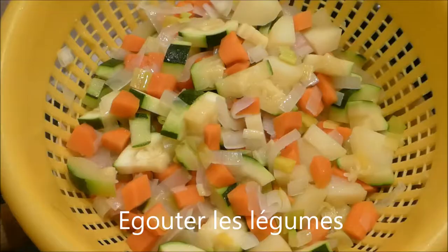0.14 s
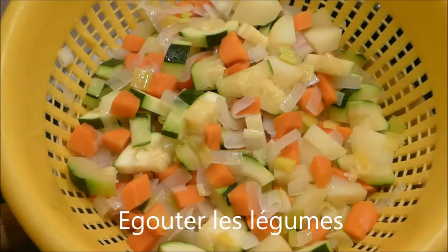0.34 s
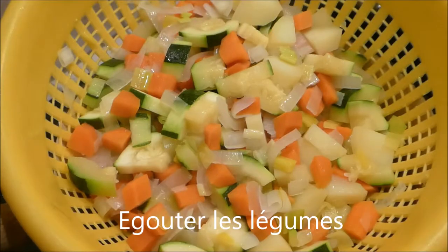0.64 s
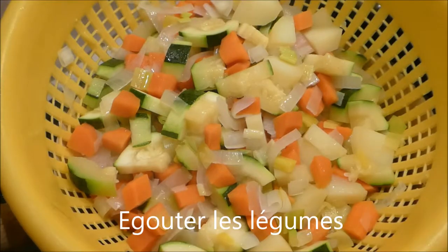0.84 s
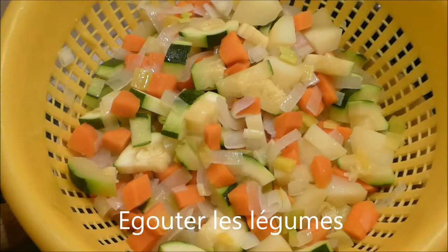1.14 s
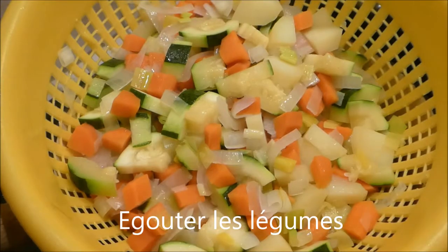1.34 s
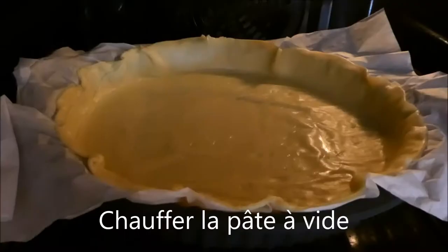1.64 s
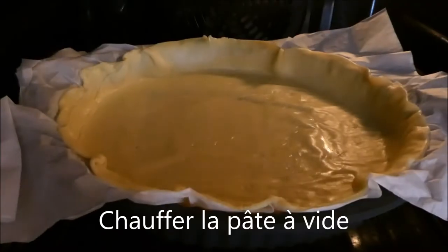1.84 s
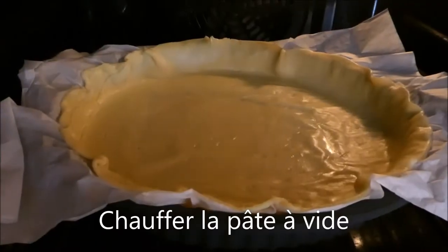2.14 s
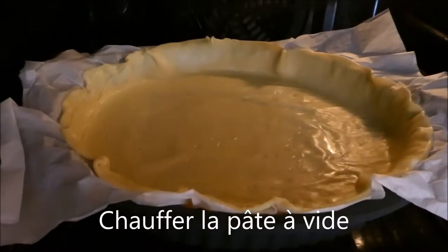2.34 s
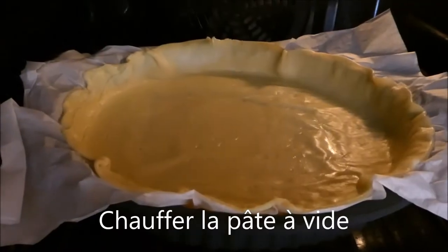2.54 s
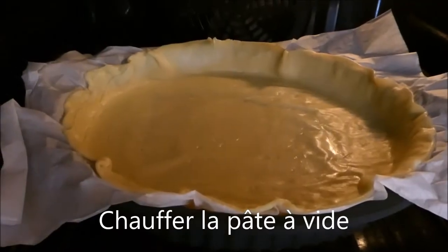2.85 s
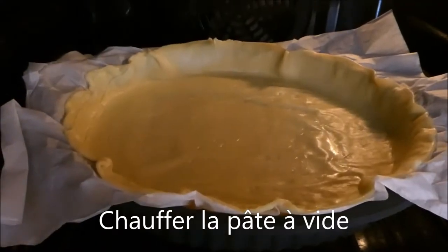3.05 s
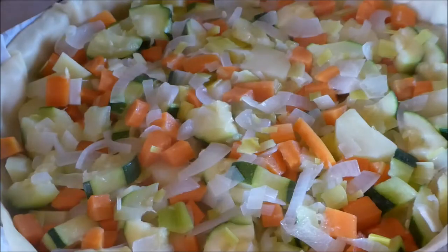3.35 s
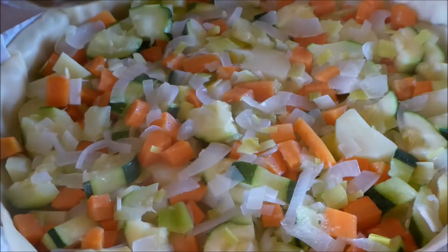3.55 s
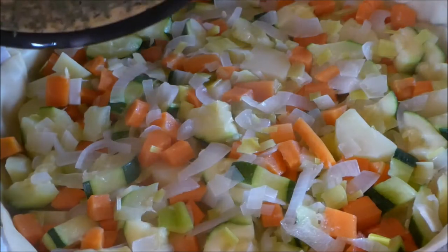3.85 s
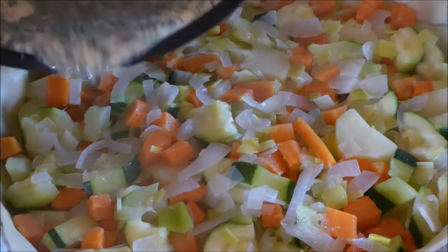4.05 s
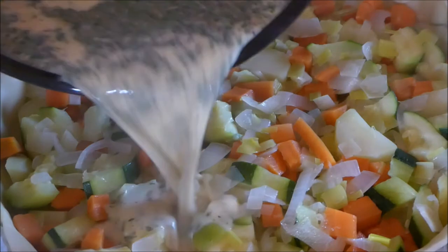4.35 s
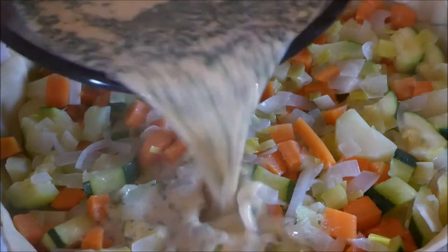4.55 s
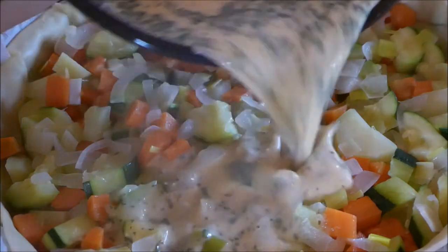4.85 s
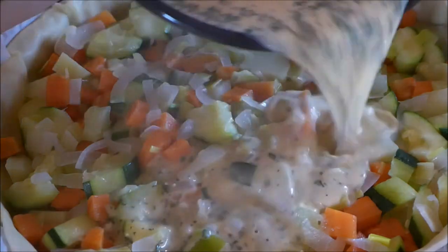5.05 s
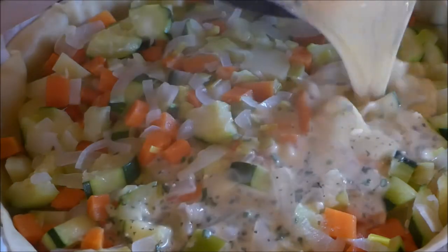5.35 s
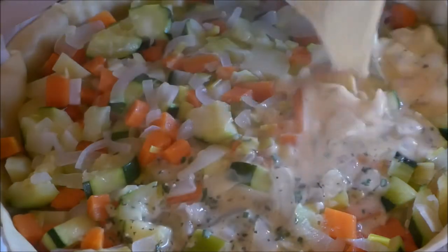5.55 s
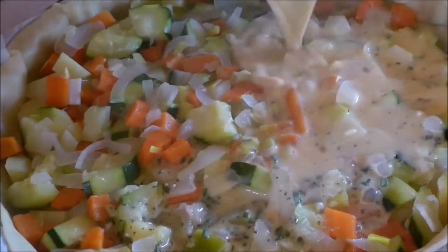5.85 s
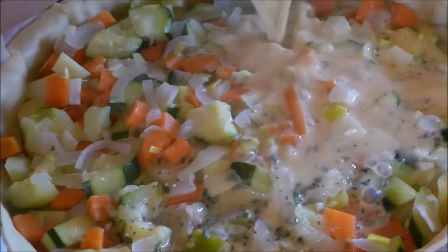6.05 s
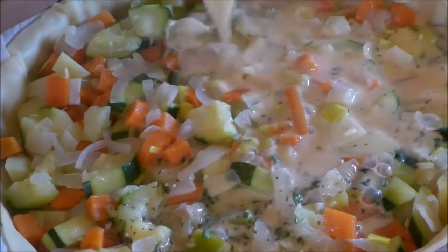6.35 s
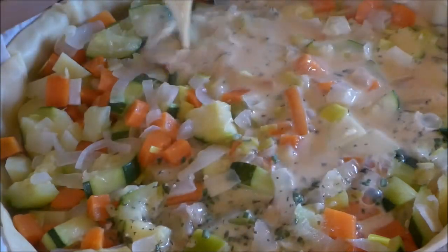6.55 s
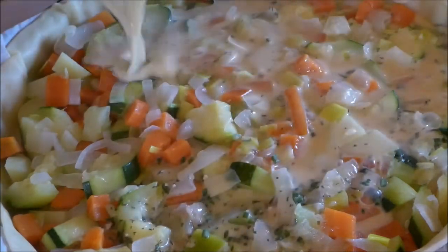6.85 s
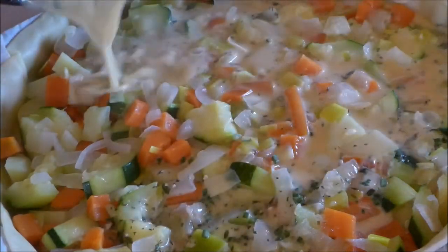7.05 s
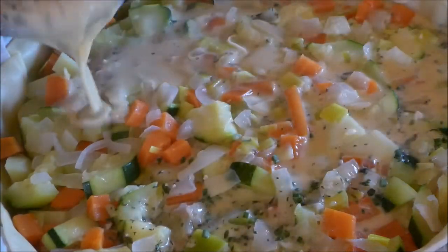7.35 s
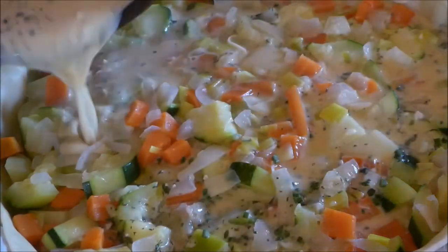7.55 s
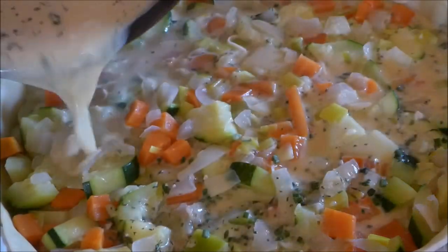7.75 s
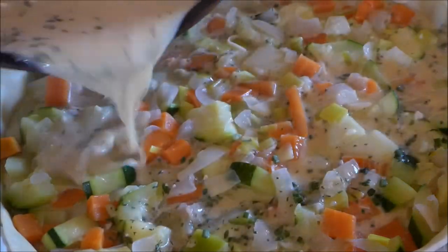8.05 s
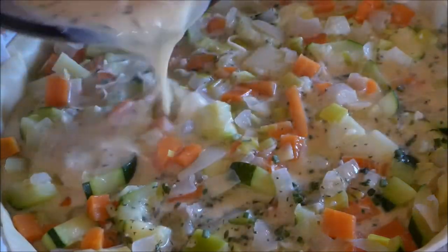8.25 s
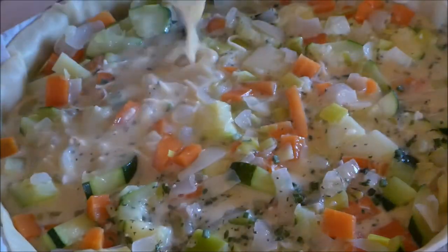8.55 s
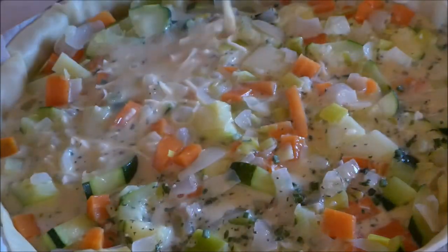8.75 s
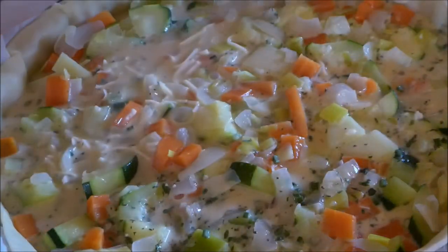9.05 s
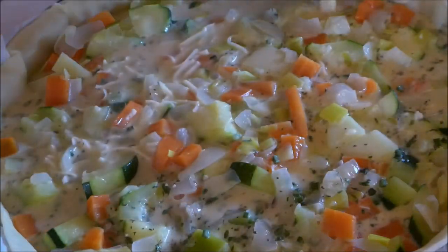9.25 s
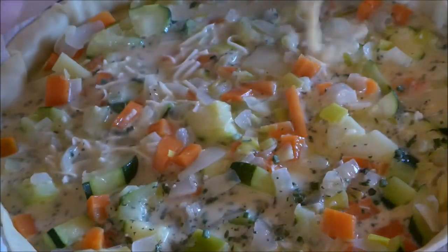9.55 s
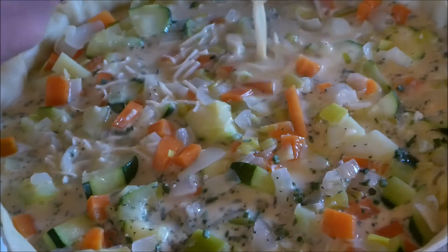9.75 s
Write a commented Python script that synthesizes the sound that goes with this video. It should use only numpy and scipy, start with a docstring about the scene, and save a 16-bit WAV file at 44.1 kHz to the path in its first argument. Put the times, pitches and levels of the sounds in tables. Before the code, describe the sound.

A whisk clatters on a glass bowl, a quiet room, a roaring fan oven, then faint wet ticks over distant fan noise and late bowl knocks.

```python
"""A kitchen, in four scenes joined by hard cuts with short silences between them. Whisk: wires strike and
scrape a glass bowl as struck modes and noise, over sloshing eggs. Quiet room: soft hiss, a distant hum, light
taps and thin chirps. Fan oven: rushing air, whistling duct, motor tones. Pour: egg mixture over diced
vegetables, nearly silent: small wet ticks of noise and ringing, knocks of the bowl, a brief slide of the whisk;
further off, steady fan noise, bright noise that fades and a thin whistle that sets in."""
import sys
import numpy as np
from scipy import signal
from scipy.fft import rfft, irfft, next_fast_len
from scipy.io import wavfile
from scipy.ndimage import map_coordinates

SR = 44100
rng = np.random.default_rng(int(sys.argv[2]) if len(sys.argv) > 2 else 0)


def waveform_to_disk(signal):
    """Save audio, clipped to [-1, 1], as 16-bit WAV at the path in sys.argv[1]."""
    frames = np.transpose(np.atleast_2d(signal))
    scaled = np.clip(frames, -1, 1) * 32767
    samples = np.round(scaled).astype(np.int16)
    wavfile.write(sys.argv[1], SR, samples)


N = 436587

# when each scene is heard: (start [s], end [s]); the last one runs to the end
WHISKING, WAITING = (0, .1685), (.202, 1.672)
BAKING, POURING = (1.831, 3.138), (3.171, 10)
# left-right likeness of the air behind the pour: (frequency [Hz], coherence [-1 to 1])
POUR_ALIKE = [(60, -0.25), (150, -0.3), (380, -0.12), (950, 0.19), (2380, 0.4), (5980, 0.65), (15000, 0.53)]


def pour():
    """Clear wet ticks over a random sprinkle of fainter ones that thins out with the stream."""
    # the clearest ticks among the vegetables:
    # (time [s], peak level [dB], starting pitch [Hz], snap [0 round pop to 1 dry crack])
    clear_ticks = [(3.9061, -32.5, 6000, .55), (3.915, -38, 11500, 0.4), (4.348, -44, 3100, 0.58),
                   (4.4697, -43, 2210, .4), (4.627, -49, 11000, .5), (4.6503, -29, 3300, .52),
                   (4.7955, -43, 12900, 0.35), (4.862, -46, 7200, .3), (4.8665, -46, 12500, .5),
                   (4.9671, -35, 10000, .65), (5.1008, -39.5, 6000, .3), (5.1156, -36, 7400, .2),
                   (5.1175, -39, 7700, .2), (5.1315, -38, 10500, .3), (5.1388, -38, 2500, 0.52),
                   (5.4485, -44, 11000, .2), (5.4512, -38.5, 3380, 0.76), (5.5046, -40.5, 6200, .55),
                   (5.5249, -44, 12200, 0.4), (5.5305, -45, 13000, .2), (5.5545, -43.5, 5300, .3),
                   (5.868, -44, 2700, 0.56), (5.9155, -46, 11500, .6), (5.943, -38, 5170, 0.1),
                   (6.006, -46, 2300, .2), (6.0865, -47, 2900, 0.55), (6.186, -45, 6500, 0.35),
                   (6.193, -42, 12800, .2), (6.1995, -40, 11000, 0.36), (6.257, -45, 9000, .7),
                   (6.311, -36, 4600, .65), (6.345, -47, 7500, .1), (6.363, -46, 11000, .5),
                   (6.372, -42, 12500, 0.5), (6.424, -34, 6620, .15), (6.4414, -36.5, 9600, .4),
                   (6.5533, -44, 8500, 0.2), (6.569, -45, 7300, .15), (6.683, -41, 5340, .2),
                   (6.6845, -44, 11500, 0.45), (6.7175, -44, 6200, 0.1), (6.7382, -38, 5800, .25),
                   (6.831, -44, 4600, .6), (6.868, -43, 9000, 0.3), (7.403, -40, 8830, .2),
                   (7.413, -39, 8500, .1), (7.6355, -41.5, 7300, .3), (7.7059, -41.5, 11500, 0.7),
                   (7.815, -39, 10700, 0.36), (8.2063, -41.5, 6250, .2), (8.547, -39, 6530, .4),
                   (8.765, -46, 11700, 0.25), (9.08, -45, 11200, .4), (9.18, -44.5, 9900, 0.3),
                   (9.28, -42, 5200, .8), (9.8737, -36.5, 6400, 0.26)]
    # close walls answer each tick: (delay [s], level [dB])
    walls = [(.0062, -15), (.0105, -18)]
    stream_start_s, stream_length_s, thinning = 4.3, 4.9, 1.2
    faintest_db, range_db = -56, 8  # peak levels of the sprinkle
    low_hz, high_hz = 3510, 13040
    ticks = np.zeros(N)
    for s, db, hz, snap in clear_ticks:
        add(ticks, s, amp(db) * wet_tick(hz, snap))
    for when, size, pitch, snap in rng.random(size=(120, 4)):
        s = stream_start_s + stream_length_s * when ** thinning
        hz = low_hz * (high_hz / low_hz) ** pitch
        db = faintest_db + range_db * size ** 2  # loud ones are rare
        add(ticks, s, amp(db) * wet_tick(hz, snap))
    echoes = sum(amp(db) * np.pad(ticks, (round(delay * SR), 0))[:N] for delay, db in walls)
    return in_room(ticks + echoes, wet_db=-8)


def wet_tick(hz, snap):
    """A wet film breaks: a broadband crack, and the short ring of the pocket behind it; peak 1."""
    life_s = 0.0082 * np.sqrt(7000 / hz)  # lower pockets ring longer
    attack_s, crack_t60_s = 0.00025, 0.0044
    pop = tick(hz, life_s, grit=0.58)
    t = clock(len(pop))
    noise = rng.standard_normal(len(t))
    crack = filtered(noise, lambda f: f / (f + 1500) / (1 + (f / 11000) ** 4))
    crack *= amp(-60 * t / crack_t60_s)
    share = np.clip(snap, 0, 1)
    ringing = pop * (1 - np.exp(-t / attack_s))
    x = (1 - share) * ringing + share * crack / np.abs(crack).max()
    return x / np.abs(x).max()


def tick(hz, life_s, grit):
    """A tiny pop: slightly rising ring and a puff of noise, down 60 dB after its life; peak 1."""
    t = clock(SR // 30)
    noise = rng.standard_normal(len(t))
    puff = unit(filtered(noise, lambda f: 1 / (1 + (2 * np.log((f + 1) / hz)) ** 4)))
    phase = 2 * np.pi * hz * t * (1 + 0.075 * np.minimum(t / life_s, 1))
    x = (np.sin(phase) + grit * puff) * amp(-60 * t / life_s)
    return x / np.abs(x).max()


def bowl_knocks():
    """The tilted bowl knocks a little to the right: dull thud, ringing rim and a crack of noise."""
    # each knock, before the bass is cut:
    # (time [s], thud peak [dB], ring peak [dB], crack rms at its start [dB])
    blows = [(4.5738, -34, -50, -58), (9.3385, -22.5, -21, -42), (9.5088, -18, -41, -55)]
    # the dull, quickly damped part: (frequency [Hz], relative level [dB], t60 [s])
    thud = [(270, -21, .04), (400, -13, .028), (530, -10, .02), (650, -2, .021), (770, 1, .013),
            (900, -2, .014), (1060, -11, .014)]
    # the ringing part; close neighbours beat: (frequency [Hz], relative level [dB], t60 [s])
    rim = [(1146, -13, .14), (1159, -3, .075), (1460, -4, .016), (1600, -2, .016), (1960, -14, .08),
           (2050, -5, .045), (2120, -11, .11), (2240, -8, .04), (2460, -12, .022), (3260, -28, .06),
           (4650, -28, .06)]
    knocks, t = np.zeros(N), clock(SR // 30)
    for s, thud_db, ring_db, crack_db in blows:
        add(knocks, s, amp(thud_db) * struck(thud, scatter_db=1.5))
        add(knocks, s, amp(ring_db) * struck(rim, scatter_db=1))
        noise = rng.standard_normal(len(t))
        crack = unit(filtered(noise, lambda hz: 1 / (1 + (hz / 9000) ** 6)))
        add(knocks, s, amp(crack_db) * crack * amp(-60 * t / 0.0099))
    return in_room(low_cut(knocks, edge_hz=284), wet_db=-7) * amp([[-.9], [.9]])


def struck(modes, scatter_db):
    """Modes set off in phase by one clean blow, each at a new strength; peak 1."""
    t = clock(SR // 3)
    x = np.zeros(len(t))
    for hz, db, t60 in modes:
        x += amp(db + scatter_db * rng.normal() - 60 * t / t60) * np.sin(2 * np.pi * hz * t)
    x *= 1 - np.exp(-t / 0.0013)  # soft attack
    return x / np.abs(x).max()


def whisk_slide():
    """The whisk slides in the tilted bowl: a hiss with a short zing, then a rub, all with uneven grip."""
    # hiss of wet wires on glass: (frequency [Hz], relative density [dB per Hz])
    wet_wires = [(1500, -8), (4200, -4.5), (4700, -1), (5300, -1.5), (8000, -1.5), (11500, -1.5),
                 (15500, -20)]
    hiss = swell(crest_s=9.5, db=-48, rise=111, fall=48) * rush(wet_wires, POUR_ALIKE, [(4700, 200, 3.5)])
    # both resonances sink as the wires slide on
    zing = swell(crest_s=9.5, db=-52, rise=130, fall=150)
    zing = zing * sinking(centre_hz=4690, half_width_hz=100, crest_s=9.5, hz_per_s=600)
    rub = swell(crest_s=9.79, db=-54, rise=45, fall=110)
    rub = rub * sinking(centre_hz=2980, half_width_hz=440, crest_s=9.79, hz_per_s=2200)
    grip = unit(amp(1.4 * wobble(300)))
    return grip * (hiss + zing + rub)


def sinking(centre_hz, half_width_hz, crest_s, hz_per_s):
    """Noise of rms 1 in one resonance that sinks through its centre at the crest."""
    hz = centre_hz - hz_per_s * np.clip(clock() - crest_s, -1, 1)
    return np.sqrt(2) * narrow(0, half_width_hz) * np.sin(2 * np.pi * np.cumsum(hz) / SR)


def whisk():
    """Close wires strike and scrape the glass while eggs slosh; noise follows the fading stroke."""
    # scraping wires: (frequency [Hz], relative density [dB per Hz])
    scrape_colour = [(650, -51.5), (1100, -20), (1810, -6), (2040, -10), (2360, -2), (2640, -12.5),
                     (3330, -13), (4020, -8.5), (4490, -17.5), (6120, -21), (6830, -29.5), (10500, -35.5),
                     (15500, -47.5)]
    # moving eggs: (frequency [Hz], relative density [dB per Hz])
    slosh_colour = [(40, -32), (100, -12), (220, -18.5), (320, -8.5), (750, -3), (950, -2.5), (1300, -14),
                    (2500, -29)]
    # left-right likeness close by: (frequency [Hz], coherence [-1 to 1])
    near_alike = [(60, 0.7), (380, 0.85), (2380, 0.77), (15000, 0.89)]
    force_db = stroke_db(clock())
    chatter = unit(amp(1.2 * wobble(260)))  # the wires catch and let go
    scrape = amp(-23 + force_db) * chatter * rush(scrape_colour, near_alike)
    # the eggs follow only a fifth of the fade
    slosh = amp(-41.5 + .2 * force_db) * rush(slosh_colour, near_alike)
    # one wire squeaks along the glass, still swelling at the cut
    squeak = swell(crest_s=0.2, db=-35.5, rise=200, fall=280) * narrow(3950, half_width_hz=110)
    return wire_strikes() + squeak + scrape + slosh


def wire_strikes():
    """The wires hit the glass one after another, and each hit rings the bowl's modes."""
    # hits, before the bass is cut: (time [s], peak level [dB])
    hits = [(0, -20.5), (.0045, -14.5), (.016, -19.5), (0.0261, -18), (.0495, -27.5), (.0605, -22.5),
            (.068, -24), (.084, -29.5), (.098, -28), (.122, -27), (.1436, -29), (.161, -33)]
    # glass bowl with the whisk in it: (frequency [Hz], relative level [dB], t60 [s])
    glass = [(490, -23, .2), (835, -18.5, .2), (1775, -17, .11), (2215, -7.5, .05), (2307, 3, .06),
             (2400, -7, .05), (2504, -9, .2), (2810, -17.5, .12), (2960, -16.5, .16), (3140, -16.5, .14),
             (3688, -16.5, .18), (3890, -13.5, .12), (3984, -14, .18), (4151, -15.5, .15), (4720, -24, .15),
             (6185, -29.5, .2)]
    strikes = np.zeros(N)
    for s, db in hits:
        add(strikes, s, amp(db) * ring(glass, scatter_db=2))
    return in_room(low_cut(strikes, edge_hz=360), wet_db=-13.5)


def ring(modes, scatter_db):
    """One blow on a set of modes, each at a new strength and phase; peak 1."""
    t = clock(SR // 3)
    x = np.zeros(len(t))
    for hz, db, t60 in modes:
        strength = amp(db + scatter_db * rng.normal() - 60 * t / t60)
        x += strength * np.sin(2 * np.pi * (hz * t + rng.random()))
    return x / np.abs(x).max()


def stroke_db(s):
    """Force of one stroke, in dB below its start: it drops quickly at first, then eases off."""
    stroke_s, fade_db, ease = 0.18, 15, 0.69
    return -fade_db * (np.abs(s) / stroke_s) ** ease


def oven():
    """The fan drives air through the oven's cavity and a whistling duct; its motor sings over it."""
    # moving air: (frequency [Hz], relative density [dB per Hz])
    air_colour = [(18, -70), (30, -29), (97, -27), (160, -14.5), (197, -6), (505, -4), (561, -5),
                  (709, -0.5), (1020, -5), (1110, -5), (1680, -5), (2070, -9.5), (2910, -6), (4310, -5.5),
                  (15500, -30.5)]
    # left-right likeness: (frequency [Hz], coherence [-1 to 1])
    alike = [(60, 0.48), (150, 1), (380, 0.69), (950, 0.79), (2380, 0.89), (5980, 0.88), (15000, 0.9)]
    # resonances that colour the air: (frequency [Hz], width [Hz], lift [dB])
    peaks = [(240, 66, 6.3), (395, 26, 3.5), (623, 50, 3), (910, 60, 3.5), (1212, 60, 5), (1707, 290, 9.5),
             (2970, 370, 8.3), (3600, 220, 4.9), (4260, 190, 4.6), (4850, 100, 4.7), (6640, 540, 1.9),
             (8600, 270, 3.9)]
    # steady motor tones, before a common trim: (frequency [Hz], rms level [dB])
    motor_tones = [(199.6, -54.5), (281.5, -53.5), (564, -54), (600.3, -62), (640.8, -63), (760, -57),
                   (845.5, -56), (919.3, -61), (1000.3, -57.5), (1044.7, -52.5), (3018, -65)]
    air = amp(-38.5) * rush(air_colour, alike, peaks, ripple_db=1.1)
    duct = amp(-50) * narrow(1660, half_width_hz=26)
    return air + duct + amp(-0.84) * hum(motor_tones, waver_db=1.6, spread=0.45)


def still_room():
    """A distant appliance hums under soft hiss; light taps sound, and thin chirps come and go."""
    # soft hiss: (frequency [Hz], relative density [dB per Hz])
    air_colour = [(30, -19), (100, -14), (170, -4.5), (300, -0.5), (600, 2), (950, 2.5), (1400, -4),
                  (2500, -5), (3700, -8.5), (5200, -12), (6500, -16.5), (9000, -14), (12000, -13.5),
                  (15500, -17)]
    # left-right likeness: (frequency [Hz], coherence [-1 to 1])
    alike = [(60, -0.052), (240, -0.62), (950, -0.47), (3770, 0.037), (15000, 0.7)]
    # resonances that colour the air: (frequency [Hz], width [Hz], lift [dB])
    peaks = [(1026, 40, 10), (1200, 100, 4.5), (1720, 350, 6.5), (3180, 330, 4.5), (4240, 220, 6),
             (5000, 310, 6), (8100, 300, 1), (8360, 330, 5.5), (10800, 1200, 1.5)]
    # steady motor tones: (frequency [Hz], rms level [dB])
    motor_tones = [(199.5, -78), (399, -77), (603, -79), (1028, -73)]
    # light taps: (time [s], peak level [dB], starting pitch [Hz])
    light_taps = [(.449, -48, 1270), (.463, -53, 1270), (0.633, -55, 3220)]
    taps = np.zeros(N)
    for s, db, hz in light_taps:
        add(taps, s, amp(db) * tick(hz, life_s=.03, grit=.4))
    air = amp(-57.5) * rush(air_colour, alike, peaks)
    return air + hum(motor_tones, waver_db=0.5, spread=1.5) + in_room(taps, wet_db=-5) + chirps()


def chirps():
    """Each thin, high chirp is a narrow band of noise that swells, sinks in pitch and fades."""
    # (start [s], length [s], first pitch [Hz], last pitch [Hz], half width [Hz], crest rms level [dB])
    glides = [(.52, .09, 15000, 13900, 350, -69), (.57, .1, 11350, 11050, 130, -66),
              (0.647, .09, 11050, 10500, 160, -64), (.75, .11, 13950, 13750, 160, -65),
              (.89, .08, 12500, 10500, 1200, -68), (1, .11, 12500, 10300, 1200, -70),
              (1.2, .1, 8550, 8050, 200, -71)]
    out = np.zeros(N)
    for s, length, first_hz, last_hz, half_width_hz, db in glides:
        u = np.linspace(0, 1, round(length * SR))
        noise = rng.standard_normal(SR // 4)
        flutter = unit(filtered(noise, lambda hz: 1 / (1 + (hz / half_width_hz) ** 2)))[:len(u)]
        phase = 2 * np.pi * np.cumsum(first_hz + (last_hz - first_hz) * u) / SR
        add(out, s, amp(db) * np.sqrt(2) * np.sin(np.pi * u) * flutter * np.sin(phase))
    return out


def far_fan():
    """Hollow, steady fan noise further off behind the pour, slightly stronger on the right."""
    # moving air: (frequency [Hz], relative density [dB per Hz])
    air_colour = [(18, -62), (30, -23), (100, -10.5), (160, -6), (202, -2), (324, -2), (410, -3.5),
                  (467, -4), (747, -8), (874, -9.5), (1050, -8.5), (1330, -7), (3680, -20), (4910, -21.5),
                  (9940, -21.5), (15500, -29.5)]
    # resonances and dips that colour it: (frequency [Hz], width [Hz], lift [dB])
    peaks = [(205, 45, 4), (410, 58, 11.5), (570, 90, 1.5), (730, 110, -5.5), (865, 160, 11.5),
             (995, 45, 5), (1090, 120, -2.5), (1380, 220, 2.8), (1820, 430, 1.3), (2123, 130, 5),
             (2550, 340, 3.6), (3650, 600, -2.8), (4960, 1400, 4.3)]
    air = amp(-53.9) * rush(air_colour, POUR_ALIKE, peaks, ripple_db=1.16)
    return air * amp([[-.4], [.4]])


def fading_noise():
    """Bright noise that dies away at a steady dB per second as the pouring scene opens."""
    start_db, fade_db_per_s = -52.5, 105
    fade = amp(start_db - fade_db_per_s * np.maximum(clock() - POURING[0], 0))
    colour = [(300, -20), (1500, 0), (4500, 0), (7000, -9), (15000, -25.5)]  # (Hz, dB per Hz)
    return fade * rush(colour, POUR_ALIKE)


def whistle():
    """A thin high whistle, noise in one narrow resonance, sets in and stays."""
    start_s, attack_s = 6.9, .1
    onset = np.clip((clock() - start_s) / attack_s, 0, 1)
    return amp(-72) * onset * narrow(4884, half_width_hz=63)


def rush(spectrum, alike, peaks=(), ripple_db=1.78):
    """Stereo noise of rms 1: a broad colour, resonant lifts and a fine random ripple over frequency."""
    def response(hz):
        lift = sum(db / (1 + (2 * (hz - centre) / width) ** 2) for centre, width, db in peaks)
        ripple = ripple_db * map_coordinates(rng.standard_normal(400), [2 * np.sqrt(hz)])
        # this angle splits mid and side so that left and right have the wanted coherence
        turn = np.arccos(np.clip(along(alike, hz), -1, 1)) / 2
        return amp(along(spectrum, hz) + lift + ripple) * np.array([np.cos(turn), np.sin(turn)])
    mid, side = filtered(rng.standard_normal((2, N)), response)
    return unit(np.array([mid + side, mid - side]))


def hum(lines, waver_db, spread):
    """Motor tones that waver a little; spread [rad] is the phase between left and right."""
    out = np.zeros((2, N))
    for hz, db in lines:
        offset = spread * np.array([[.5], [-.5]]) * rng.choice([-1, 1])
        phase = 2 * np.pi * (hz * clock() + rng.random()) + offset
        out += np.sqrt(2) * amp(db + waver_db * wobble(6.01)) * np.sin(phase)
    return out


def narrow(centre_hz, half_width_hz):
    """Noise of rms 1 in one resonance, at half amplitude one half width from its centre."""
    noise = rng.standard_normal(N)
    return unit(filtered(noise, lambda hz: 1 / (1 + ((hz - centre_hz) / half_width_hz) ** 2)))


def in_room(x, wet_db):
    """A near sound, alike at both channels, plus the kitchen's short diffuse tail 4 ms later."""
    # reverberation: (frequency [Hz], t60 [s])
    decay = [(200, 0.42), (1500, 0.55), (5000, 0.19), (14000, 0.27)]
    hz, t, z = signal.stft(rng.standard_normal((2, SR // 2)), SR, nperseg=256)
    tail = signal.istft(z * amp(-60 * t / along(decay, hz)[:, None]), SR, nperseg=256)[1]
    tail = np.pad(tail / np.linalg.norm(tail[0]), ((0, 0), (SR // 250, 0)))
    return x + amp(wet_db) * signal.fftconvolve(x[None], tail, axes=1)[:, :N]


def low_cut(x, edge_hz):
    """Small objects radiate almost no bass."""
    return signal.sosfilt(signal.butter(3, edge_hz, "high", fs=SR, output="sos"), x)


def swell(crest_s, db, rise, fall):
    """Gain that climbs to a crest and falls again, each at its own dB per second."""
    t = clock() - crest_s
    return amp(db - np.abs(np.where(t < 0, rise, fall) * t))


def wobble(rate):
    """A smooth random curve, rate knots a second."""
    return map_coordinates(rng.standard_normal(int(N * rate / SR) + 4), [clock() * rate])


def filtered(x, response):
    """x times a response of frequency."""
    count = x.shape[-1]
    m = next_fast_len(count + 8192)
    return irfft(rfft(x, m) * response(np.fft.rfftfreq(m, 1 / SR)), m)[..., :count]


def along(points, hz):
    """(frequency [Hz], value) points read on a log frequency axis."""
    f, v = np.transpose(points)
    return np.interp(np.log(hz + 1), np.log(f + 1), v)


def add(track, s, sound):
    """Mix a sound into a track at time s."""
    part = track[max(0, round(s * SR)):][:len(sound)]
    part += sound[:len(part)]


def amp(db):
    """Decibels to gain."""
    return 10 ** (np.asarray(db) / 20)


def unit(x):
    """x at rms 1."""
    return x / np.sqrt(np.mean(x ** 2) + 1e-20)


def clock(count=N):
    """Sample times in seconds."""
    return np.arange(count) / SR


def during(span):
    """1 within a scene, 0 outside."""
    return (clock() >= span[0]) & (clock() < span[1])


def scene():
    """The four scenes, joined by hard cuts."""
    pouring = pour() + bowl_knocks() + whisk_slide() + far_fan() + fading_noise() + whistle()
    return (during(WHISKING) * whisk() + during(WAITING) * still_room()
            + during(BAKING) * oven() + during(POURING) * pouring)


def record(dry):
    """Everything above 15.7 kHz is removed."""
    return filtered(dry, lambda hz: hz < 15700)


dry = scene()
out = record(dry)
waveform_to_disk(out)
```